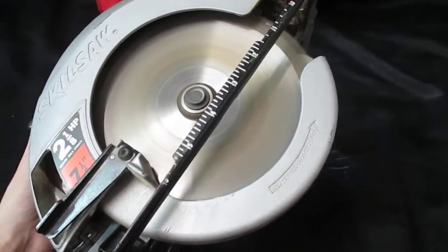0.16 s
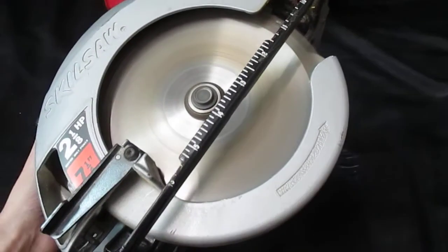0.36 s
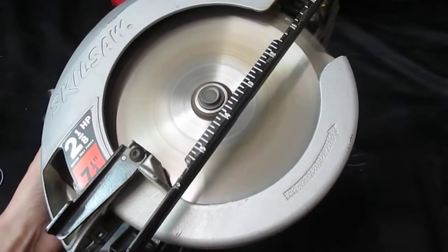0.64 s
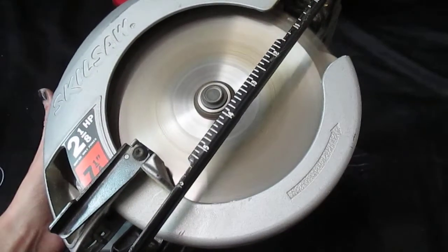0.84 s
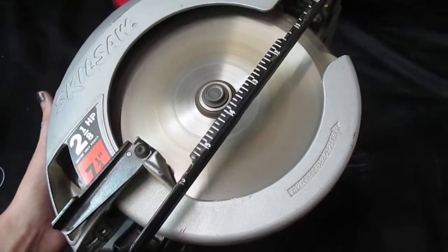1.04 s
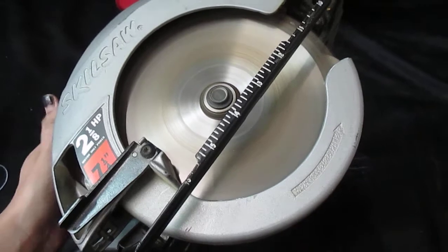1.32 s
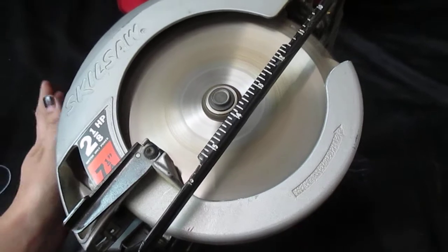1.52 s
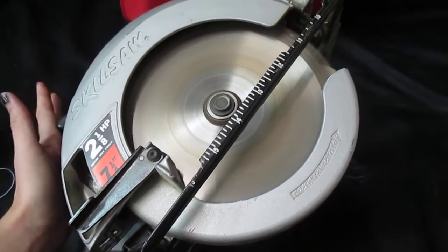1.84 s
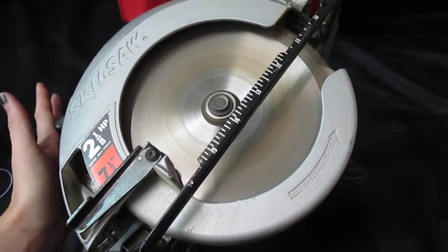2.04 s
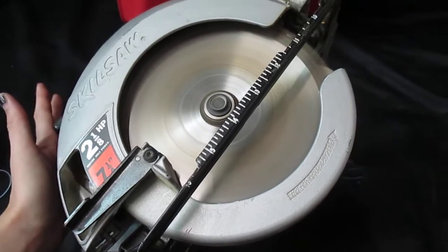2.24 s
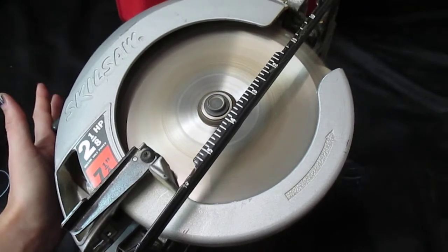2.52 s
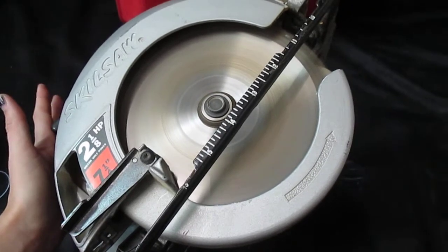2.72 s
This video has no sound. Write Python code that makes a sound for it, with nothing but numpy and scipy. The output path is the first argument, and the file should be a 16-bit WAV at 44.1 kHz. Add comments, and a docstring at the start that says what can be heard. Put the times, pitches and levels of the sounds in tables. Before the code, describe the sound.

A circular saw spins freely at full speed, heard very close and dry; almost at once the motor cuts out and its piercing whine slides steadily lower through airy rush, with rapid metallic gear rattle.

```python
"""Close to the microphone, a hand-held circular saw runs free, is switched off and coasts down.
The whine is a sine at the armature's twelfth order, with weaker shaft tones; fan air is filtered noise.
Brush and motor noise fades out after switch-off. Gear knocks, chatter and blade ring are short noise
bursts through the resonances of the metal; a faint rumble lies below and a few bright snaps above."""
import sys
import numpy as np
from scipy import signal
from scipy.fft import rfft, irfft
from scipy.io import wavfile
from scipy.ndimage import uniform_filter1d

SR = 44100
rng = np.random.default_rng(int(sys.argv[2]) if len(sys.argv) > 2 else 0)


def master(y):
    """Save y as 16-bit WAV."""
    cut = np.clip(np.atleast_2d(y).T, -1, 1)
    pcm = np.round(cut * 32767)  # scale
    wavfile.write(sys.argv[1], SR, pcm.astype(np.int16))


N = 126567
T = np.arange(N) / SR

# whine sliding through the housing's resonances: (time [s], level [dB])
WHINE_LEVEL = [(0, -16.5), (.18, -14.5), (.33, -14.5), (.44, -21), (.475, -31), (.53, -24), (.68, -23.5),
               (.78, -27), (.86, -22), (.97, -18.5), (1.1, -19.5), (1.22, -18.5), (1.29, -19), (1.335, -22),
               (1.39, -20), (1.56, -16), (1.7, -20.5), (1.82, -27), (1.93, -29), (2.11, -24.5), (2.25, -34),
               (2.55, -25), (2.72, -19), (2.87, -19.5)]
# once-per-turn hum of the armature: (time [s], level [dB])
HUM_LEVEL = [(0, -30), (.47, -34), (.57, -36.5), (.8, -34), (.97, -36), (1.05, -45), (1.2, -43), (1.3, -54),
             (1.6, -41), (1.8, -52), (1.95, -40), (2.35, -42.5), (2.87, -44)]
# weaker shaft tones: (multiple of shaft speed, level at full speed [dB], level at half speed [dB])
SHAFT_ORDERS = [(4, -30, -56), (6, -57, -25.5), (9, -38, -33), (10, -34, -45), (11, -30, -30.5),
                (15, -33, -53), (16, -42, -33), (24, -51, -33), (32, -62, -50), (36, -58, -58)]
# colour of the fan and blade rush, relative:
# (frequency [Hz], density at full speed [dB per Hz], density at half speed [dB per Hz])
AIR_COLOUR = [(25, -25, -39), (60, -30, -23), (150, -19, -25.5), (275, -14, -15), (463, -11.5, -9.5),
              (685, -4.5, -10.5), (903, 3, -0.5), (1240, 2, 3.5), (1296, 1, -1.5), (1940, -6, -3.5),
              (2440, -4.5, 2), (2860, -6, -7.5), (3240, 0.5, -7.5), (4470, -7, -13.5), (6600, -5.5, -12.5),
              (8540, -10.5, -18), (10240, -18.5, -26), (11740, -23.5, -36.5), (15700, -34, -47)]
# resonances of housing, guard and blade:
# (frequency [Hz], width [Hz], lift for the air [dB], lift for the knocks [dB])
BODY_MODES = [(346, 27, 4, 9), (866, 61, 2, -6), (1172, 83, 0, 12), (1754, 68, 3.5, -1),
              (2401, 52, 9, -0.5), (2572, 78, 7.5, 9), (2723, 70, 8.5, 15), (3540, 120, 3.5, -5),
              (4150, 190, 4, 12), (4740, 72, 3.5, 9), (5360, 75, 7, 2), (5690, 160, 2.5, 6),
              (6230, 58, -5, 8), (6410, 120, 4, 6), (7100, 99, -12, 11.5), (7700, 50, -7, -4),
              (8030, 70, -3, 7), (9140, 340, 1.5, 5), (9750, 250, -4.5, -3), (10150, 180, 3.5, 5.5),
              (11100, 270, 2.5, 6)]
# colour of brush buzz and motor churn, relative: (frequency [Hz], density [dB per Hz])
DRIVE_COLOUR = [(25, -19), (70, -18), (160, -9.5), (400, -9), (800, -8), (1150, 3), (1500, -2.5),
                (4000, -21), (7000, -27), (9300, -14), (11000, -34), (15700, -32)]
# narrow rings of the powered motor: (frequency [Hz], width [Hz], level [dB], pulsing depth [0-1])
MOTOR_RINGS = [(1120, 20, -26.5, 0.7), (2770, 32, -33, 0.1), (8870, 200, -36.5, 0.56),
               (9840, 110, -38.5, 0.6)]
# low rumble: (time [s], level [dB])
RUMBLE_LEVEL = [(0, -54), (.6, -54), (1.8, -63), (2.2, -56), (2.5, -58), (2.87, -56)]
# gear knocks, before the trims: (time [s], clack level [dB], high blade ring level [dB])
GEAR_KNOCKS = [(0.0219, -19, -28), (0.0421, -19, -26), (0.0824, -19, -25), (0.1104, -20, -21),
               (0.135, -20, -23), (0.1837, -21, -24), (0.2361, -24, -23), (0.2645, -23, -24),
               (0.3116, -23, -23), (0.3418, -17, -28), (0.3624, -17, -30), (0.3886, -20, -28),
               (0.4155, -17, -31), (0.4417, -17, -27), (0.4711, -16, -31), (0.5018, -17, -32),
               (0.5294, -20, -27), (0.5611, -19, -25), (0.5895, -17, -24), (0.6144, -20, -34),
               (0.7154, -20, -28), (0.7822, -19, -31), (0.8173, -19, -34), (0.8439, -22, -36),
               (0.9129, -18, -32), (0.9468, -20, -37), (0.9831, -17, -35), (1.0126, -19, -31),
               (1.0405, -18, -38), (1.0718, -19, -38), (1.1203, -18, -36), (1.1557, -18, -31),
               (1.1922, -18, -33), (1.2151, -19, -29), (1.246, -15, -30), (1.2721, -19, -29),
               (1.2892, -20, -33), (1.3263, -19, -37), (1.3787, -19, -27), (1.4094, -20, -24),
               (1.4394, -18, -30), (1.4666, -19, -25), (1.4926, -17, -33), (1.5279, -19, -25),
               (1.5762, -18, -29), (1.6032, -18, -32), (1.6523, -21, -29), (1.688, -17, -27),
               (1.7198, -20, -29), (1.7549, -17, -31), (1.7937, -16, -30), (1.8294, -19, -34),
               (1.846, -16, -30), (1.8866, -19, -32), (1.9258, -21, -28), (1.9611, -17, -26),
               (1.9971, -19, -25), (2.0366, -19, -28), (2.0668, -19, -36), (2.1018, -20, -26),
               (2.1356, -20, -26), (2.1729, -18, -34), (2.2011, -18, -30), (2.2203, -18, -32),
               (2.2512, -21, -33), (2.2708, -18, -28), (2.2985, -21, -31), (2.3194, -20, -23),
               (2.3444, -23, -30), (2.364, -19, -31), (2.4034, -20, -34), (2.4402, -19, -20),
               (2.4764, -20, -32), (2.4945, -19, -25), (2.5194, -22, -26), (2.5355, -20, -31),
               (2.5734, -21, -29), (2.5956, -20, -29), (2.6217, -18, -28), (2.6536, -19, -26),
               (2.6684, -19, -33), (2.6969, -21, -21), (2.7704, -16, -26), (2.8094, -18, -30),
               (2.8262, -19, -33), (2.8624, -20, -33)]
# colour of a knock, relative: (frequency [Hz], clack density [dB per Hz], high ring density [dB per Hz])
KNOCK_SPECTRUM = [(60, -36, -50), (400, -12, -43), (1100, 3.5, -27), (2000, -2.5, -22), (3300, -0.5, -18),
                  (4700, -7.5, -16), (6630, -1, -18), (7950, -4, -3), (9320, -14.5, 7), (10980, -32, -6),
                  (11900, -30, -20), (15700, -28, -28)]
# sharp little snaps of grit: (time [s], level [dB])
GRIT_SNAPS = [(1.441, -33), (1.576, -35), (1.999, -31), (2.369, -40), (2.735, -39)]

START_HZ, TOP_HZ, OFF_S = 405.8, 413.8, .325  # shaft turns per second; moment of switch-off
FRICTION_HZ_PER_S, AIR_DRAG_PER_TURN = 24.1, .00058  # steady braking; braking per speed squared
WAVER, WAVER_HZ = 0.00059, 30  # speed waver as a fraction, and its rate
WHINE_ORDER, FLUTTER_DB, FLUTTER_HZ = 12, 0.9, 45
AIR_DB, PATCH_DB = -17.5, 0.5  # rms of the rush; rms of its uneven patches
THROB, BLADE_RATIO = 0.097, .157  # throb depth; throbs per shaft turn
DRIVE_DB, DRIVE_FADE_S, PULSE_PER_TURN = -23, 0.096, 0.11
RUMBLE_HZ = 220
KNOCK_RISE_S = .0032
KNOCK_FALL_S, RING_FALL_S, SLOW_STRETCH = .0058, .0036, .3  # falls before the low-speed stretch
KNOCK_DB, RING_DB, KNOCK_GRAIN = 3.5, 0, 0.29  # clack trim; high ring trim; unevenness of the noise
CHATTER_PER_S, CHATTER_SPREAD_DB, CHATTER_SLOW_DB = 70, 4.5, -2.5  # slow: change at half speed
CHATTER_DB, CHATTER_RING_DB = -32, -43  # typical levels at full speed, before the trims
SNAP_S, SNAP_HZ, SNAP_WIDTH_HZ = 0.0022, 12000, 4000
CUT_HZ = 15740


def amp(db):
    """Decibels to gain."""
    return 10 ** (np.asarray(db) / 20)


def unit(x):
    """Scales to rms 1."""
    return x / np.sqrt(np.mean(x ** 2) + 1e-20)


def follow(points):
    """Draws a level curve in dB over the whole scene."""
    return np.interp(T, *np.transpose(points))


def read(points, hz, axis=1):
    """One column of a spectrum table on a log-frequency axis."""
    p = np.array(points, float)
    return np.interp(np.log(hz + 1), np.log(p[:, 0]), p[:, axis])


def wander(hz):
    """Smooth random drift of rms 1, with a Gaussian roll-off around the given rate."""
    rolloff = np.exp(-(np.fft.rfftfreq(N, 1 / SR) / hz) ** 2)
    return unit(irfft(rfft(rng.standard_normal(N)) * rolloff, N))


def lift(hz, axis):
    """Decibels that the body resonances add."""
    return sum(m[axis] / (1 + (2 * (hz - m[0]) / m[1]) ** 2) for m in BODY_MODES)


def ring(x, db_at, size=8192):
    """Causal minimum-phase filter of unit energy with the shape of the given dB response."""
    log_gain = np.log(amp(db_at(abs(np.fft.fftfreq(size, 1 / SR)))))
    min_phase = np.exp(signal.hilbert(log_gain).conj())
    taps = np.fft.ifft(min_phase).real[:size // 2]
    return signal.fftconvolve(x, taps / np.linalg.norm(taps))[:N]


def shaft():
    """Turns a second: creeps up under power, then friction and air drag slow it."""
    # closed form of d(speed)/dt = -(friction + drag * speed^2)
    knee = np.sqrt(FRICTION_HZ_PER_S / AIR_DRAG_PER_TURN)
    rate = np.sqrt(FRICTION_HZ_PER_S * AIR_DRAG_PER_TURN)
    coast = knee * np.tan(np.arctan(TOP_HZ / knee) - rate * (T - OFF_S))
    powered = START_HZ + (TOP_HZ - START_HZ) * T / OFF_S
    return uniform_filter1d(np.where(T < OFF_S, powered, coast), size=1500)


def tones(turns, slow):
    """Whine, hum and weaker orders: sines locked to the shaft, each fluttering a little."""
    levels = [(WHINE_ORDER, follow(WHINE_LEVEL)), (1, follow(HUM_LEVEL))]
    levels += [(round(k), fast + (half - fast) * slow) for k, fast, half in SHAFT_ORDERS]
    out = np.zeros(N)
    for order, db in levels:
        gain = amp(db + FLUTTER_DB * wander(FLUTTER_HZ))
        out += gain * np.sin(2 * np.pi * (order * turns + rng.random()))
    return out


def air(turns, slow, size=1024):
    """Housing turbulence: noise that dulls as the speed falls and throbs with each blade turn."""
    overlap = size - size // 4
    hz, t, z = signal.stft(rng.standard_normal(N), SR, nperseg=size, noverlap=overlap)
    body = lift(hz, axis=2)
    fast = (read(AIR_COLOUR, hz, axis=1) + body)[:, None]
    half = (read(AIR_COLOUR, hz, axis=2) + body)[:, None]
    patches = uniform_filter1d(rng.standard_normal(z.shape), size=10, axis=0)
    patches = unit(uniform_filter1d(patches, size=7, axis=1))
    z = z * amp(fast + (half - fast) * np.interp(t, T, slow) + PATCH_DB * patches)
    rush = signal.istft(z, nperseg=size, noverlap=overlap)[1][:N]
    throb = 1 + THROB * np.sin(2 * np.pi * BLADE_RATIO * turns)
    return amp(AIR_DB) * unit(rush * throb)


def drive(turns):
    """Noise and pulsing rings of the powered motor, gone soon after the switch opens."""
    out = amp(DRIVE_DB) * ring(rng.standard_normal(N), lambda hz: read(DRIVE_COLOUR, hz))
    pulse = np.sin(2 * np.pi * PULSE_PER_TURN * turns)
    for hz, width, db, depth in MOTOR_RINGS:
        drift = wander(width) + 1j * wander(width)
        fuzzy = (drift * np.exp(2j * np.pi * hz * T)).real
        out = out + amp(db) * unit(fuzzy * (1 + depth * pulse))
    return out * np.clip(1 - (T - OFF_S) / DRIVE_FADE_S, 0, 1)


def rumble():
    """A faint rumble under the rush: low-passed noise riding a level curve."""
    return amp(follow(RUMBLE_LEVEL)) * wander(RUMBLE_HZ)


def bursts(rows, fall_s, slow):
    """Gritty noise under a quick rise and fall for each (time, dB); longer at low speed."""
    power = np.zeros(N)
    for s, db in rows:
        part = power[int(s * SR):][:SR // 20]  # a view, so += writes into power
        t = T[:len(part)]
        fall = fall_s * (1 + SLOW_STRETCH * np.interp(s, T, slow))
        shape = np.minimum(t / KNOCK_RISE_S, 1) * np.exp(-np.maximum(t - KNOCK_RISE_S, 0) / fall)
        part += (amp(db) * shape) ** 2
    grain = np.exp(KNOCK_GRAIN * rng.standard_normal(N))
    return np.sqrt(power) * unit(rng.standard_normal(N) * grain)


def rattle(slow, count=400):
    """Gear teeth knock in their slack: a scraping clack plus a high metal ring, over lighter chatter."""
    times = np.cumsum(rng.gamma(2, .5, count)) / CHATTER_PER_S
    sizes = CHATTER_SPREAD_DB * rng.standard_normal(count)
    sizes = sizes + CHATTER_SLOW_DB * np.interp(times, T, slow)
    chatter = np.transpose([times, CHATTER_DB + sizes, CHATTER_RING_DB + sizes])
    s, clack_db, high_db = np.vstack([GEAR_KNOCKS, chatter]).T
    clack = ring(bursts(zip(s, clack_db), KNOCK_FALL_S, slow),
                 lambda hz: read(KNOCK_SPECTRUM, hz, axis=1) + lift(hz, axis=3))
    high = ring(bursts(zip(s, high_db), RING_FALL_S, slow),
                lambda hz: read(KNOCK_SPECTRUM, hz, axis=2) + lift(hz, axis=3))
    return amp(KNOCK_DB) * clack + amp(RING_DB) * high


def snaps():
    """Bright clicks of grit: noise with instant onset and fast decay through one broad resonance."""
    burst = sum(amp(db) * (T > s) * np.exp(-abs(T - s) / SNAP_S) for s, db in GRIT_SNAPS)
    return ring(burst * rng.standard_normal(N),
                lambda hz: -10 * np.log10(1 + (2 * (hz - SNAP_HZ) / SNAP_WIDTH_HZ) ** 2))


def scene():
    """One shaft speed steers the saw's layers; slow is 0 at full speed and 1 at half."""
    speed = shaft()
    turns = np.cumsum(speed * (1 + WAVER * wander(WAVER_HZ))) / SR
    slow = np.log2(TOP_HZ / speed)
    saw = tones(turns, slow) + air(turns, slow) + drive(turns)
    return (saw + rumble() + rattle(slow) + snaps())[None]


def record(dry):
    """The recorder's band limit: a steep linear-phase low-pass."""
    low_pass = signal.firwin(801, CUT_HZ, window=("kaiser", 9), fs=SR)
    return signal.oaconvolve(dry, low_pass[None], "same")


dry = scene()
out = record(dry)
master(out)
```